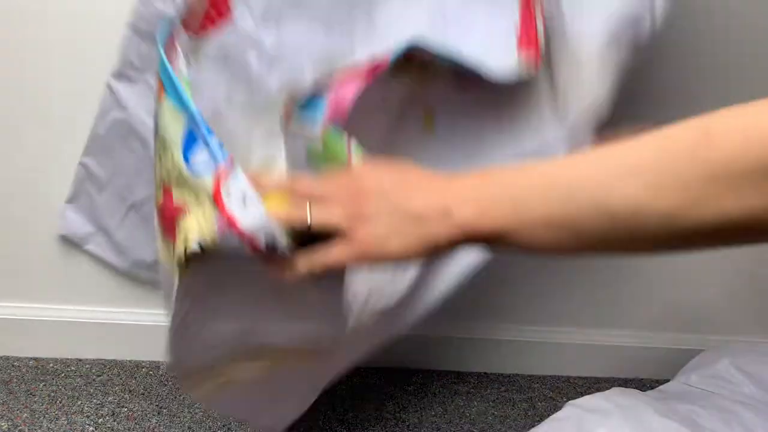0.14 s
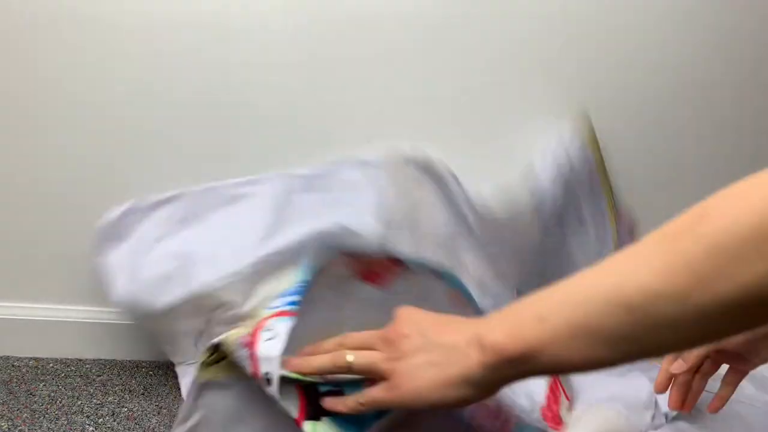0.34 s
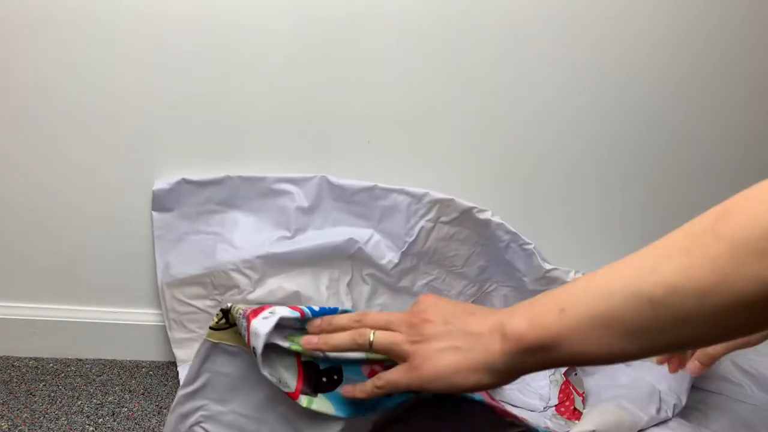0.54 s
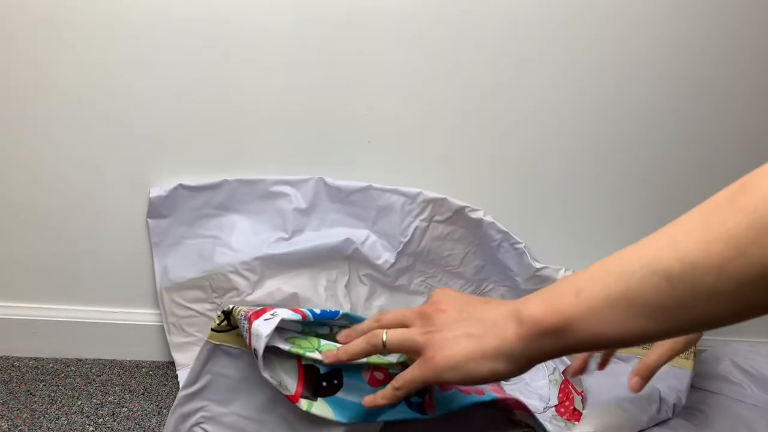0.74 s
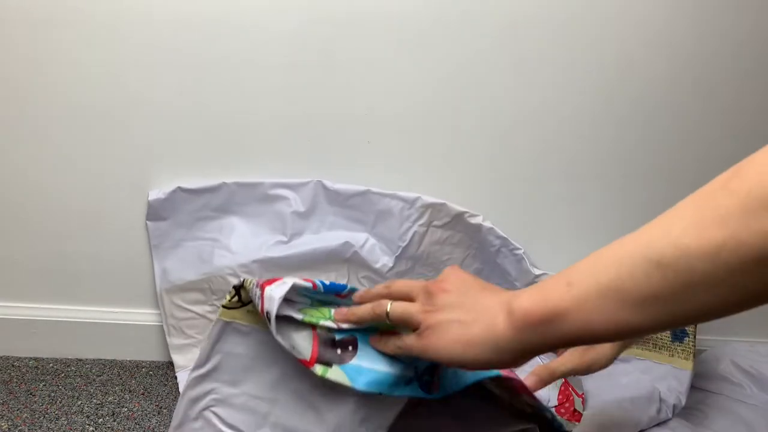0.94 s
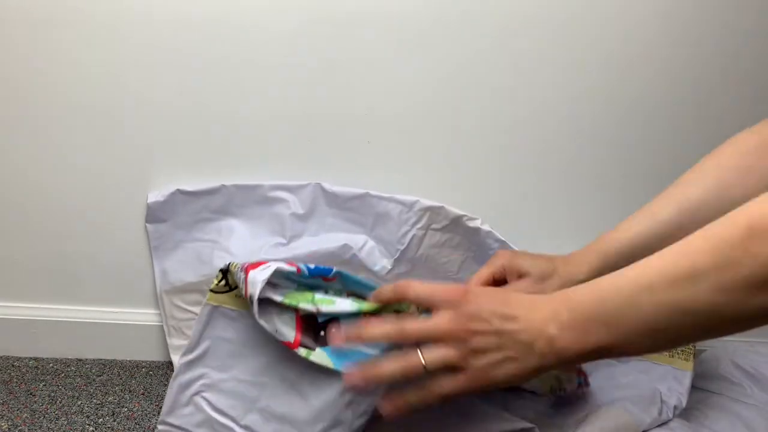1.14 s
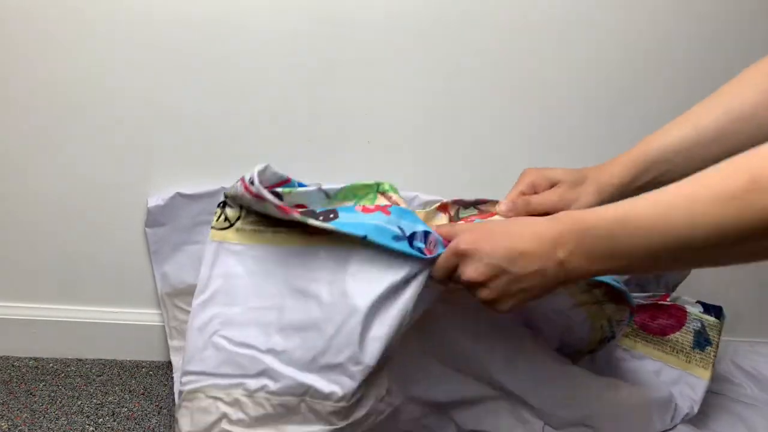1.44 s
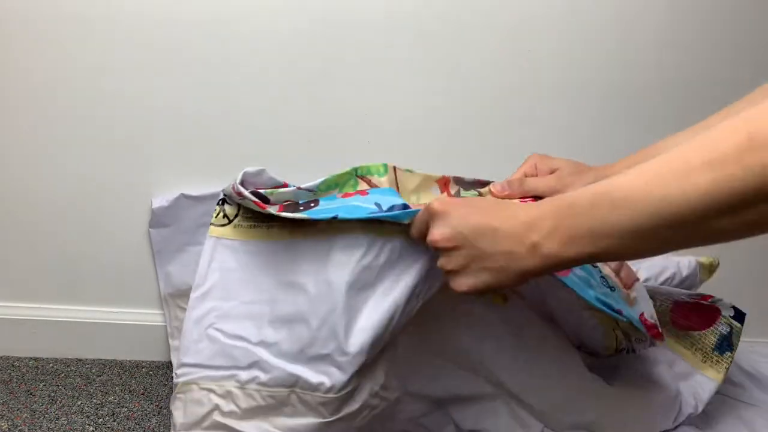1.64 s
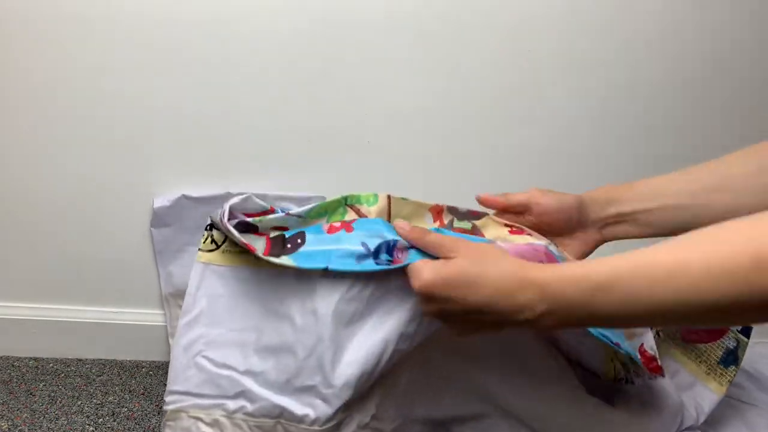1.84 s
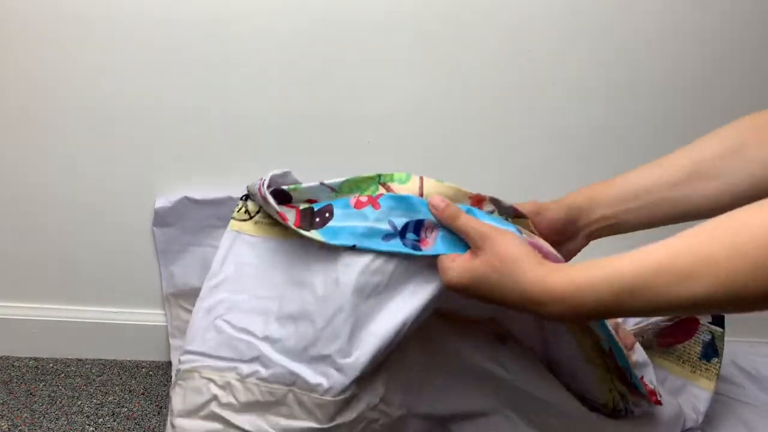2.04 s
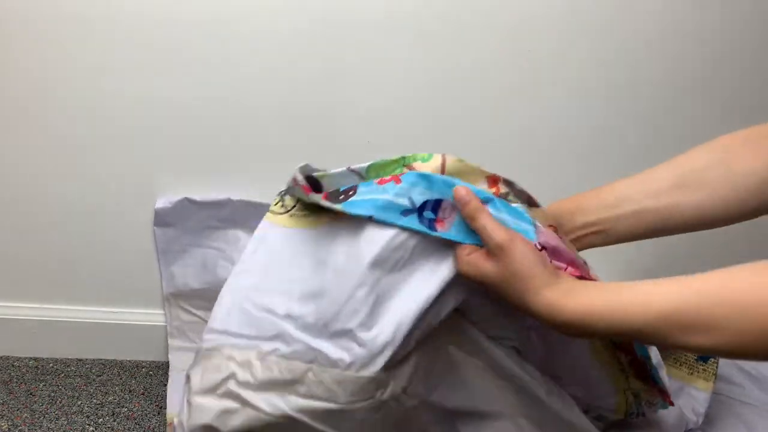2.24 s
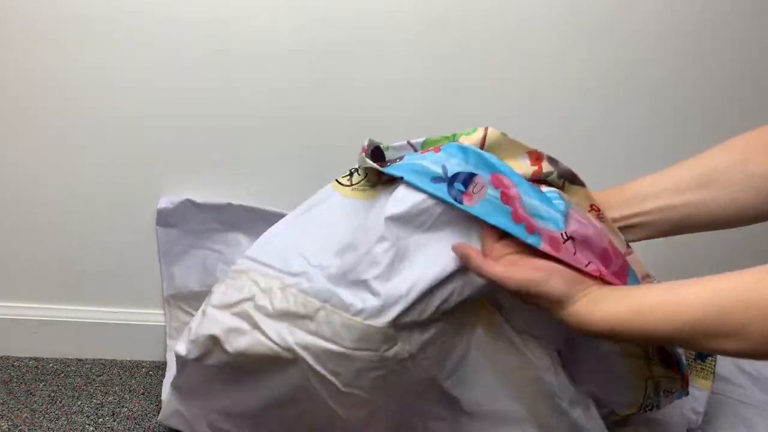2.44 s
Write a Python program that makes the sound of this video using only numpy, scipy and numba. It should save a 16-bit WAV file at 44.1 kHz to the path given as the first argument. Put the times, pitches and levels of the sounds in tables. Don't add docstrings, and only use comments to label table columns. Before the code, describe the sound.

A vinyl sheet is slapped down onto carpet with a loud thump and crackle, then softly handled

```python
import sys
import numpy as np
from scipy import signal
from scipy.fft import rfft, irfft
from scipy.io import wavfile
from scipy.ndimage import uniform_filter1d
from numba import njit

SR = 44100
rng = np.random.default_rng(int(sys.argv[2]) if len(sys.argv) > 2 else 0)


def generate_wav(signal):
    frames = np.transpose(np.atleast_2d(signal))
    scaled = np.clip(frames, -1, 1) * 32767
    pcm = np.round(scaled).astype(np.int16)
    wavfile.write(sys.argv[1], SR, pcm)


def volts_from_db(level):
    exponent = np.asarray(level, float) / 20
    return 10 ** exponent


N = 114660

# freq_hz, level_db (per Hz)
HISS_COLOUR = [(500, 4.5), (1000, -7.5), (2500, -11.5), (5000, -13.5), (7000, -13), (10000, -12.5),
               (15600, -14), (16300, -45)]
SCATTER_CAP = 1.8


def colour(x, table):
    hz, db = np.array(table, float).T
    f = np.arange(N // 2 + 1) * SR / N + 1
    return irfft(rfft(x) * volts_from_db(np.interp(np.log(f), np.log(hz), db)), N)


def unit(x):
    return x / np.sqrt(np.mean(x ** 2))


def band(x, hz, width_hz):
    f = np.arange(N // 2 + 1) * SR / N
    return unit(irfft(rfft(x) / (1 + ((f - hz) / width_hz * 2) ** 4), N))


def walk(rate_hz):
    hold = int(SR / rate_hz)
    levels = np.repeat(rng.standard_normal(N // hold + 1), hold)
    return unit(uniform_filter1d(levels, hold)[:N])


@njit
def pops(size, at_s, hz, cycles, gain, sag, rise_cycles, low_hz):
    out = np.zeros(size)
    for k in range(len(at_s)):
        i, phase, envelope, step = int(at_s[k] * SR), 0., 1., hz[k] / SR
        while envelope > .003 and i < size:
            out[i] += gain[k] * envelope * np.sin(2 * np.pi * phase) * min(1., phase / rise_cycles)
            phase += step
            envelope *= np.exp(-3 * step / cycles[k])
            step -= sag[k] * step * (step - low_hz / SR)
            i += 1
    return out


def echo(x, t60_s, tilt_db):
    t = np.arange(N) / SR
    cloud = colour(rng.standard_normal(N), [(200, 0), (12000, tilt_db)]) * volts_from_db(-60 * t / t60_s)
    return signal.fftconvolve(x, cloud / np.sqrt(np.sum(cloud ** 2)))[:N]


def room_tone():
    # freq_hz, level_db (per Hz)
    rumble_colour = [(25, -18), (59, -8.5), (150, -22), (344, -18.5), (600, -27.5), (2000, -37),
                     (5000, -40.5), (7000, -62.5)]
    # pitch_hz, width_hz, level_db
    hums = [(55, 22, -58), (358, 42, -65)]
    out = unit(colour(rng.standard_normal(N), rumble_colour)) * volts_from_db(-57 + 2.5 * walk(7.7))
    for hz, width_hz, db in hums:
        out = out + volts_from_db(db) * band(rng.standard_normal(N), hz, width_hz)
    return out


def effort():
    # time_s, slide_db, buckling_over_slide_db
    drop = [
        (0, -61.5, 18),
        (0.059, -48, -3.5),
        (0.238, -42.5, 12.5),
        (0.248, -32, 2),
        (0.318, -44.5, 24.5),
        (0.323, -31.5, 9.5),
        (0.392, -28, 4.5),
        (0.581, -69, 14.5),
        (.7, -73.5, 12),
    ]
    # time_s, slide_db, buckling_over_slide_db
    hands = [(0.82, -80, 22), (0.888, -57.5, -6), (0.948, -82, 17), (0.962, -76, -12), (0.983, -57, 4),
             (1.35, -56, 10), (1.508, -48.5, 0.5), (1.628, -55.5, 11.5), (1.712, -53.5, -8),
             (1.79, -80, 25), (1.811, -55.5, 1.5), (1.88, -61.5, 2.5), (2.053, -48.5, -5),
             (2.172, -63, 11.5), (2.181, -51, 1), (2.475, -57, 9), (2.529, -65, -26), (2.6, -42.5, 4)]
    s, slide_db, over_db = np.array(drop + hands, float).T
    t = np.arange(N) / SR
    return volts_from_db(np.interp(t, s, slide_db)), volts_from_db(np.interp(t, s, slide_db + over_db))


def slide(gain):
    # start_s (centre), length_s, pitch_hz, level_db
    rubs = [
        (0.073, 0.011, 9700, -44),
        (0.091, 0.019, 10550, -35.5),
        (.125, 0.042, 10550, -43.5),
        (0.108, 0.0099, 6600, -39.5),
        (0.157, 0.03, 6360, -47),
        (1.814, 0.0064, 11900, -57),
        (2.038, 0.009, 6800, -47.5),
    ]
    t = np.arange(N) / SR
    hiss = 0
    for hz in 800 * 2 ** np.arange(0, 4.4, 1 / 3):
        grit = rng.standard_normal(N) * volts_from_db(-1 * walk(600))
        hiss = hiss + band(grit, hz, hz * 0.28) * np.sqrt(hz) * volts_from_db(3.17 * walk(35.14))
    out = unit(colour(hiss, HISS_COLOUR)) * volts_from_db(1.5 * walk(29.53)) * gain
    for s, length_s, hz, db in rubs:
        swell = volts_from_db(db) * np.exp(-((t - s) / length_s) ** 2)
        whistle = band(rng.standard_normal(N), hz, hz * 0.17)
        out = out + swell * volts_from_db(3.0 * walk(250)) * whistle
    return out


def crinkles(gain):
    rate_hz, pitch_hz, spread_octaves, ring_cycles = 300, 4300, 0.662, 22
    scatter_db, bunch_db, level_db = 3.5, 6.5, -10
    when, rank = rng.random((int(rate_hz * N / SR), 2)).T
    offset, sign = rng.standard_normal((len(when), 2)).T
    hz = np.clip(pitch_hz * 2 ** (spread_octaves * offset), 1500, 14000)
    size = volts_from_db(scatter_db * np.minimum(-np.log(1 - rank), SCATTER_CAP)) * np.sign(sign)
    ticks = pops(N, when * N / SR, hz, ring_cycles + 0 * hz, size, 0 * hz, 1.2, 60.)
    return unit(ticks * volts_from_db(bunch_db * walk(21.97))) * gain * volts_from_db(level_db)


def buckles(gain):
    # freq_hz, level_db
    fold_colour = [(60, 1.5), (110, -9), (190, 3), (270, 4), (450, 4.5), (700, 5.5), (950, 0.5), (3000, 21)]
    rate_hz, pitch_hz, spread_octaves, ring_cycles = 1700, 339, 1.126, 2.35
    scatter_db, tilt_db_per_octave, level_db = 2.5, -3, -3.5
    when, rank = rng.random((int(rate_hz * N / SR), 2)).T
    offset, sign = rng.standard_normal((len(when), 2)).T
    octaves = spread_octaves * offset
    size_db = scatter_db * np.minimum(-np.log(1 - rank), SCATTER_CAP) + tilt_db_per_octave * octaves
    hz = np.clip(pitch_hz * 2 ** octaves, 110, 1700)
    size = volts_from_db(size_db) * np.sign(sign)
    dull_pops = pops(N, when * N / SR, hz, ring_cycles + 0 * hz, size, 0 * hz, 0.5, 60.)
    return unit(colour(dull_pops, fold_colour)) * gain * volts_from_db(level_db)


def snaps():
    # start_s, peak_db, pitch_hz, length_s, hiss_db
    creases = [(0.012, -51.5, 900, 0.0095, 0.5), (0.019, -32, 1340, 0.007, -13),
               (0.2444, -6, 1530, 0.0044, -39), (0.2477, -5.5, 535, .014, -24.5),
               (0.322, -19.5, 736, 0.0075, -11.5), (0.364, -17, 1820, 0.017, -12.5),
               (0.383, -9, 644, .016, -42), (0.464, -22.5, 880, 0.0077, -21),
               (0.905, -39, 1340, 0.015, -35), (1.18, -39, 730, 0.011, -7),
               (1.289, -28.5, 865, 0.0092, -24.5), (1.324, -32, 1230, 0.0058, -6.5),
               (1.434, -39, 590, 0.011, -16.5), (1.548, -35, 980, 0.0061, -7),
               (1.803, -46.5, 1500, 0.0052, -2), (1.923, -58, 700, 0.0068, -16),
               (2.033, -41.5, 1060, 0.0086, -12), (2.077, -45, 760, 0.0077, -7),
               (2.135, -34.5, 1390, 0.0058, -11.5), (2.184, -41.5, 783, 0.0083, -6),
               (2.22, -36, 775, 0.007, -14), (2.42, -33, 940, 0.0046, -14), (2.43, -32.5, 940, 0.0097, -16),
               (2.464, -31.5, 1270, 0.0043, -26), (2.585, -28, 1110, 0.006, -9.5)]
    # start_s, peak_db, pitch_hz
    brief_snaps = [(0.9621, -43.5, 3760), (.984, -50, 6500), (1.11, -47, 3500), (1.861, -47.5, 900),
                   (2.36, -39, 1000), (2.515, -51, 700), (2.44, -40, 1500), (2.19, -42, 2000),
                   (1.399, -45.5, 1010), (1.6163, -42, 1290), (1.6627, -42, 1180), (1.926, -41.5, 1800),
                   (1.944, -44, 1410), (1.9951, -44, 1070), (2.0545, -54, 4680), (2.553, -41, 2130)]
    tick_db, puff_db, half_spread_octaves, ring_cycles = 4, 5.5, 0.65, 1.23
    t = np.arange(N) / SR
    out = 0
    hiss = unit(colour(rng.standard_normal(N), HISS_COLOUR))
    for s, db, hz, length_s, hiss_db in creases + [(*tick, .003, -9) for tick in brief_snaps]:
        delay, pitch, sign = rng.random((3, 18))
        delay[:2], pitch[:2] = (0, 0.1193), (.45, 1)
        late_s = delay * length_s * 1.6
        tick_hz = hz * 2 ** (half_spread_octaves * 2 * (pitch - .45))
        size = volts_from_db(db + tick_db - 9 * late_s / length_s) * np.sign(sign - .5) * np.sqrt(hz / tick_hz)
        out = out + pops(N, s + late_s, tick_hz, ring_cycles + 0 * late_s, size, 0 * late_s, 0.33, 60.)
        puff = np.clip((t - s) / 0.0017, 0, 1) * np.exp(-np.abs(t - s) / length_s)
        out = out + volts_from_db(db + hiss_db + puff_db) * hiss * puff
    return out


def rings():
    # start_s, peak_db, pitch_hz, cycles, sag (per cycle)
    folds = [(0.2452, -15.5, 1770, 11, 0), (.246, -16.5, 866, 22, 0.0036), (0.246, -20, 1270, 18, 0),
             (.248, -7.5, 492, 9.1, 0.0086), (0.251, -18, 2480, 24, 0.0091), (.268, -20, 663, 15, 0),
             (.29, -24, 601, 11, 0.0011), (.323, -21, 713, 8, 0.0049), (.335, -27, 1250, 20, 0),
             (.357, -20.5, 1760, 32, 0.0027), (.383, -15.5, 873, 14.5, 0), (.384, -17, 558, 14, 0),
             (.386, -20, 458, 13, 0.0052), (.41, -31, 442, 9.1, 0), (.455, -27.5, 641, 14, 0),
             (.49, -34.5, 702, 15, 0.0048), (.525, -33.5, 194, 12, 0.023), (.56, -37.5, 169, 8.2, .05),
             (0.594, -38, 110, 5.5, 0.036), (.917, -42, 1350, 10, 0), (1.945, -41, 707, 11, 0.0043),
             (2.068, -36, 670, 12, 0.012), (2.22, -41.5, 676, 11, 0), (2.39, -34, 302, 6.7, 0)]
    s, db, hz, cycles, sag = np.array(folds, float).T
    return pops(N, s, hz, cycles, volts_from_db(db), sag, 1.5, 59.0)


def thumps():
    # start_s, peak_db, pitch_hz, cycles, sag (per cycle)
    pockets = [(0.2457, -5, 359, 4.75, 0.355), (.26, -8, 199, 5.1, 0.04), (.289, -14.5, 190, 4.3, 0.059),
               (.325, -13, 208.6, 5.9, 0.037), (0.353, -15.5, 305, 2.7, 0.089), (0.384, -12, 456, 4.5, .05),
               (.399, -18.5, 341, 6.7, 0.12), (.464, -23, 263, 3, 0.33), (0.5, -29, 128, 4.2, 0.094),
               (0.981, -45, 160, 2.2, 0.13), (1.033, -36, 348, 2, 0.11), (1.179, -33, 202, 3.8, 0.11),
               (1.33, -21.5, 235, 3.46, 0.57), (1.515, -25.5, 251, 1.4, .1), (1.551, -40, 127, 4.3, 0.37),
               (1.926, -38, 269, 2.4, 0.069), (2.035, -26.5, 316, 4.5, 0.66), (2.069, -52, 150, 3, .2),
               (2.133, -38, 182, 3.4, 0.24), (2.188, -23, 264, 1.7, 0.41), (2.219, -39.5, 120, 6.1, 0.12),
               (2.425, -36.5, 179, 2.7, 0.17), (2.583, -32, 224, 4.7, 0.13)]
    s, db, hz, cycles, sag = np.array(pockets, float).T
    boom_hz = 60 * (1 + .04 * rng.standard_normal(len(s)))
    air = pops(N, s, hz, cycles, -volts_from_db(db + 3), sag * 1.203, 0.65, 58.7)
    boom = pops(N, s + 0.0058, boom_hz, 3.5 + 0 * s, volts_from_db(db - 7), 0 * s, 2.9, 60.)
    return air + boom


def scene():
    # freq_hz, correlation (0 to 1)
    likeness = [(60, .97), (300, .9), (700, .3), (2000, .1), (5000, .15), (7000, .75), (8300, .96),
                (16000, .97)]
    t60_s, wet_db, spread_s = 0.32, -8.5, .04
    slide_gain, buckle_gain = effort()
    parts = slide(slide_gain) + crinkles(slide_gain), buckles(buckle_gain), thumps(), snaps(), rings()
    sheet = sum(parts)
    mid = sheet + volts_from_db(wet_db) * echo(sheet, t60_s, -3) + room_tone()
    side = sum(echo(part, spread_s, 0.13) for part in parts)
    side = side + volts_from_db(wet_db) * echo(sheet, t60_s, -1.5) + room_tone()

    def weigh(sign):
        return [(f, 10 * np.log10(np.clip((1 + sign * c) / 2, 1e-3, 1))) for f, c in likeness]

    mid, side = colour(mid, weigh(0.83)), colour(side, weigh(-0.97))
    return np.array([mid + side, mid - side])


def band_limit(x):
    return signal.sosfilt(signal.butter(12, 16960, fs=SR, output="sos"), x)


def record(dry):
    low_cut_hz, drift_from_hz, drift_hz_per_half_turn, ceiling = 36, 6120, 4830, .93
    f = np.arange(N // 2 + 1) * SR / N
    turn = np.exp(1j * np.pi * np.maximum(f - drift_from_hz, 0) / drift_hz_per_half_turn)
    low_cut = 1 / (1 + (low_cut_hz / (f + 1)) ** 4)
    x = irfft(rfft(dry, axis=1) * np.array([1 / turn, turn]) * low_cut, N, axis=1)
    mix = ceiling * np.tanh(x / ceiling)
    return band_limit(mix)


dry = scene()
out = record(dry)
generate_wav(out)
```